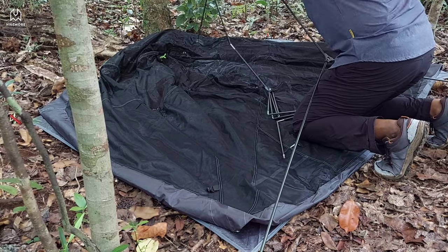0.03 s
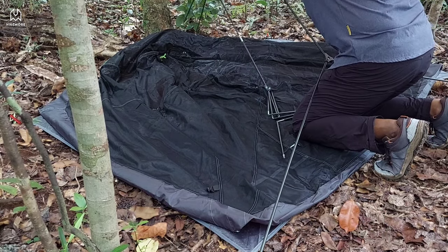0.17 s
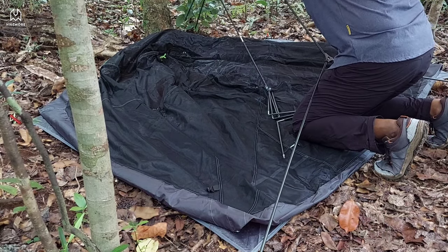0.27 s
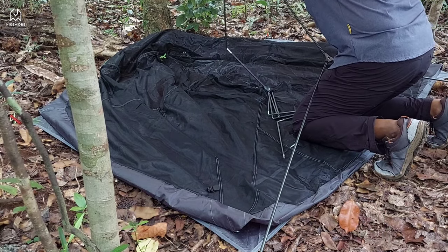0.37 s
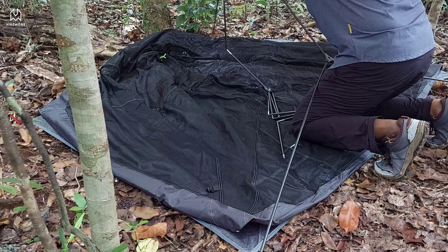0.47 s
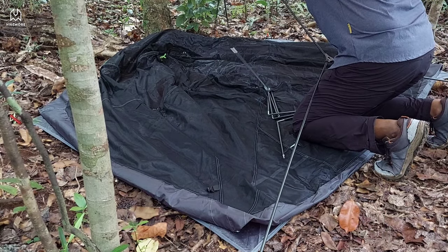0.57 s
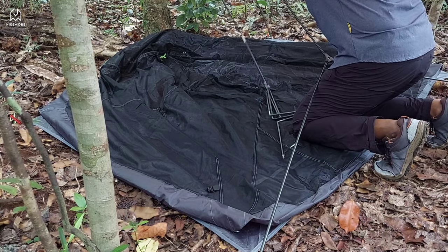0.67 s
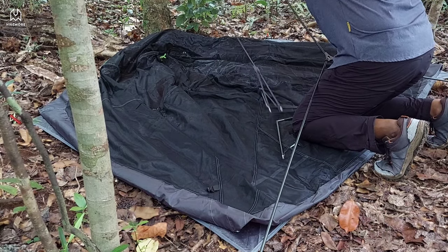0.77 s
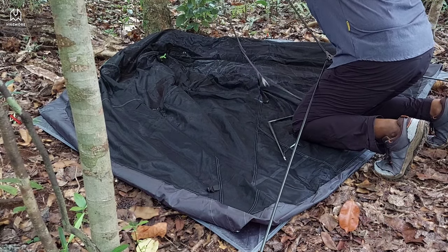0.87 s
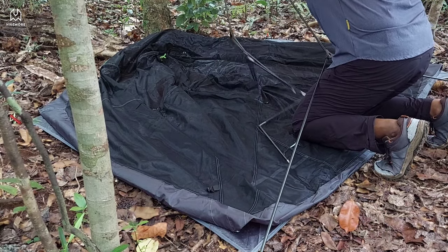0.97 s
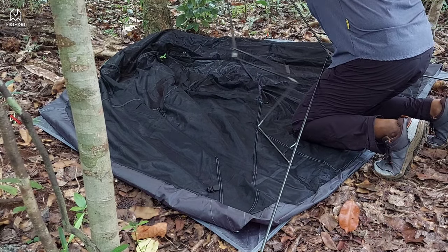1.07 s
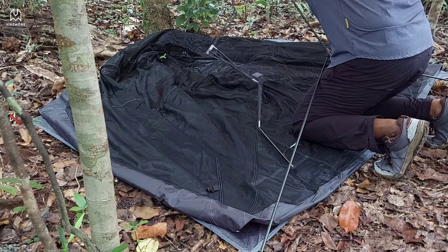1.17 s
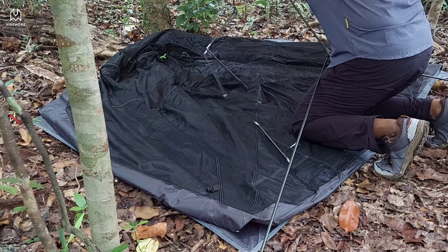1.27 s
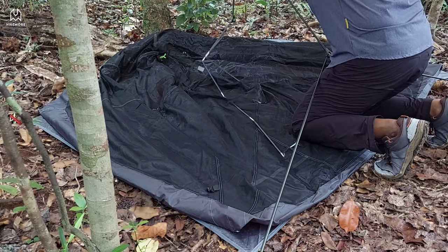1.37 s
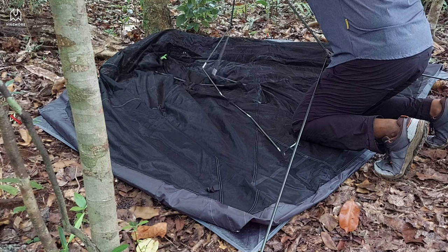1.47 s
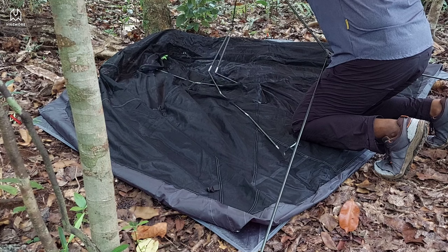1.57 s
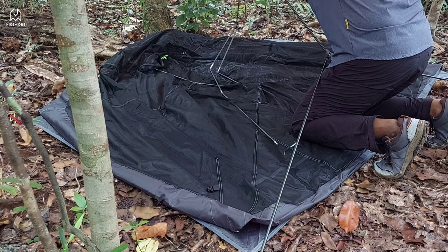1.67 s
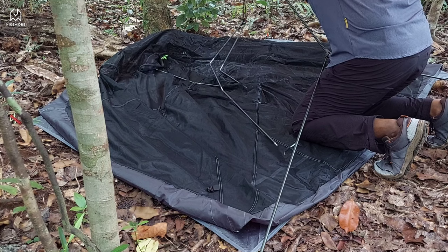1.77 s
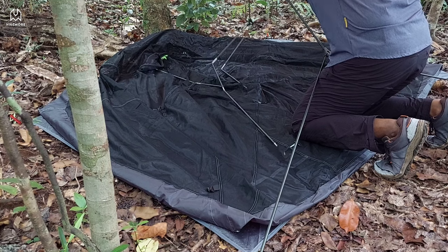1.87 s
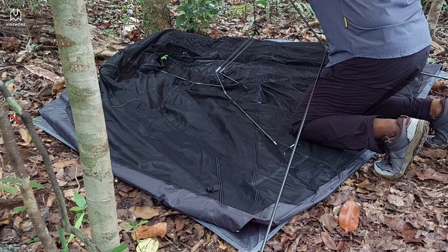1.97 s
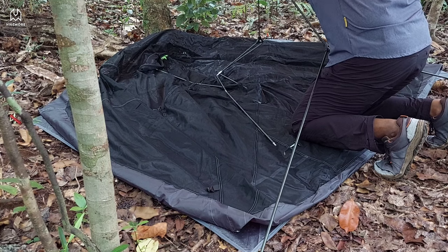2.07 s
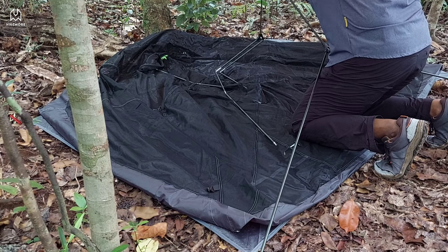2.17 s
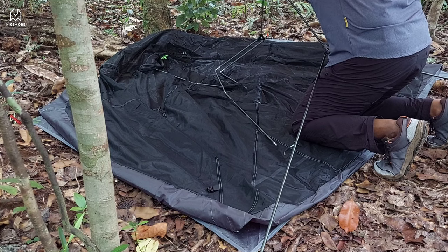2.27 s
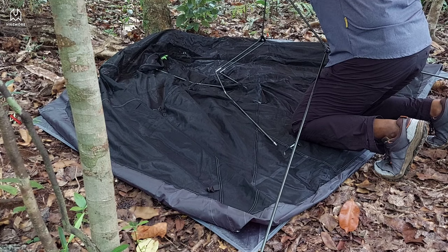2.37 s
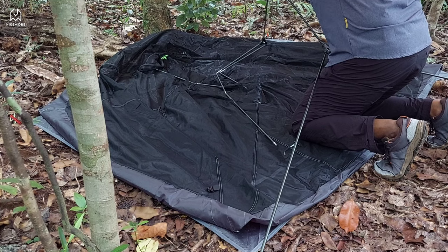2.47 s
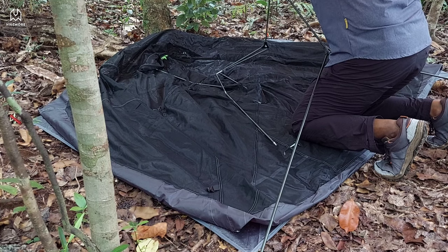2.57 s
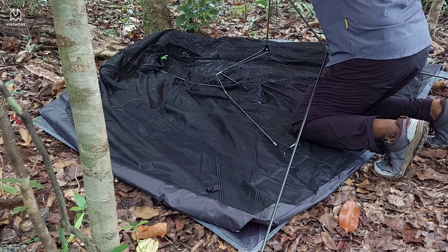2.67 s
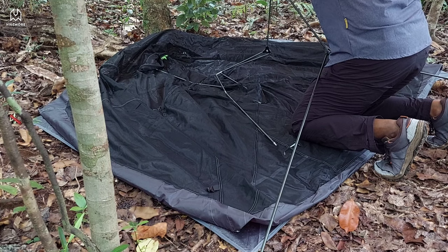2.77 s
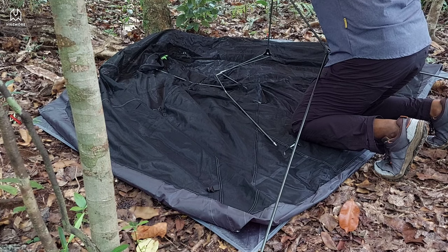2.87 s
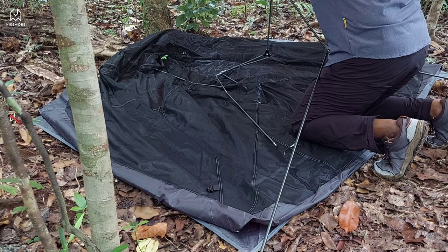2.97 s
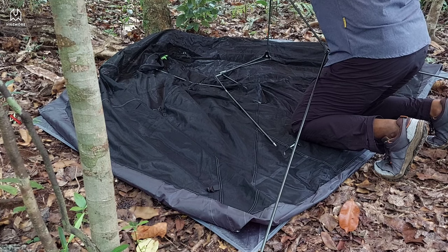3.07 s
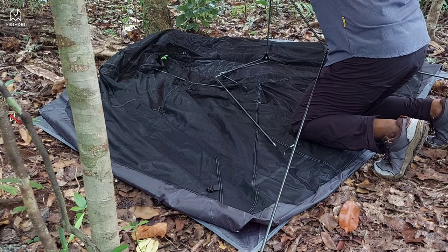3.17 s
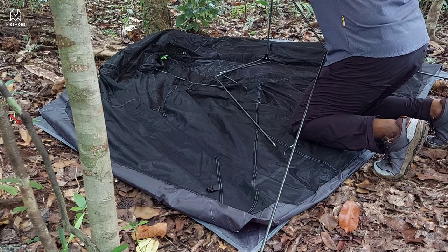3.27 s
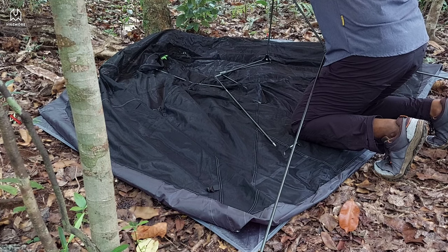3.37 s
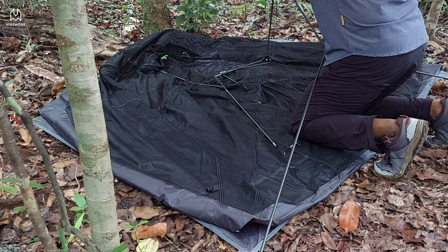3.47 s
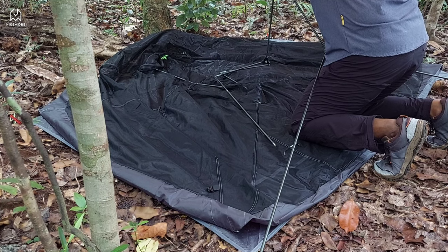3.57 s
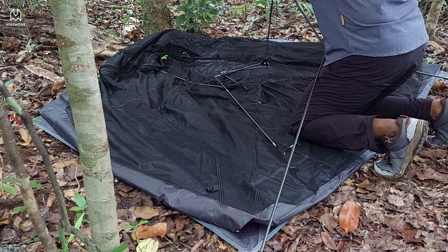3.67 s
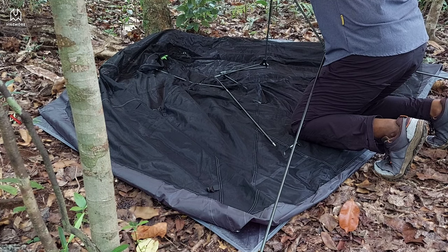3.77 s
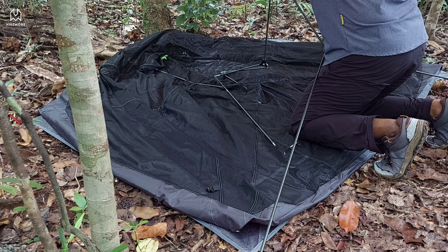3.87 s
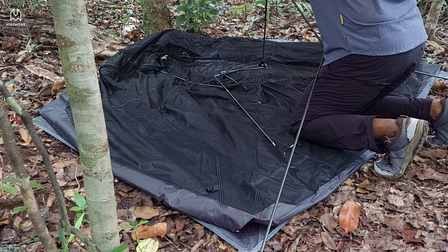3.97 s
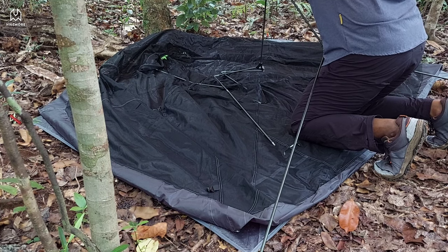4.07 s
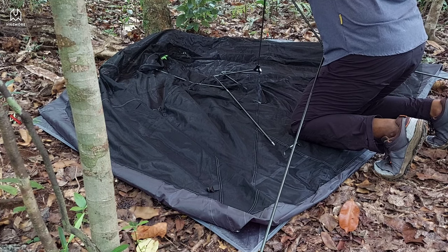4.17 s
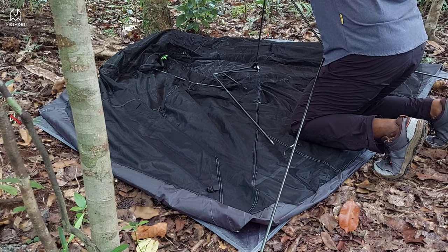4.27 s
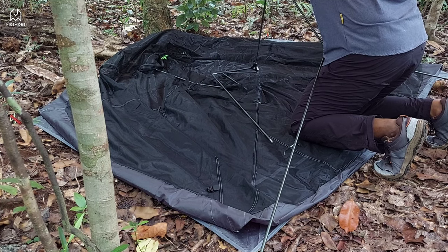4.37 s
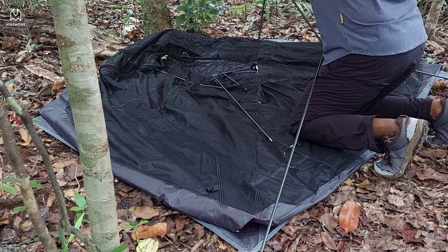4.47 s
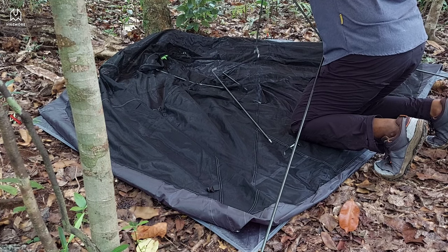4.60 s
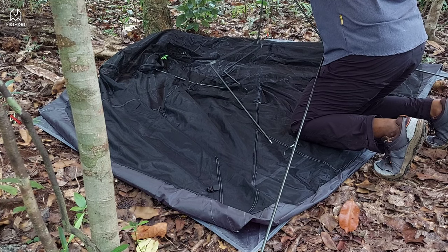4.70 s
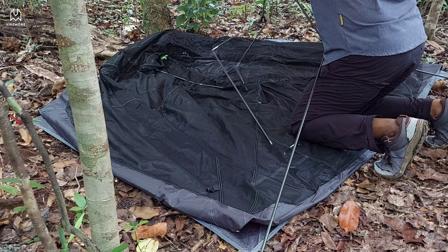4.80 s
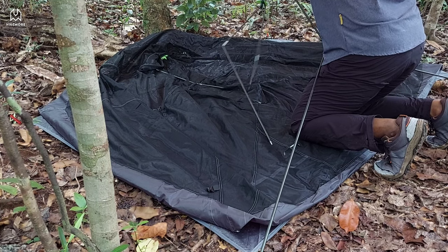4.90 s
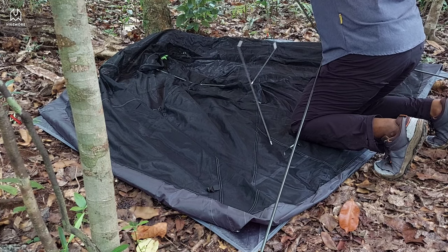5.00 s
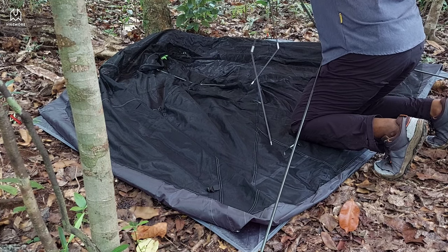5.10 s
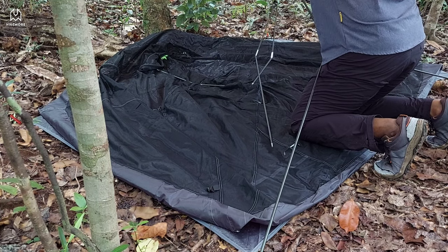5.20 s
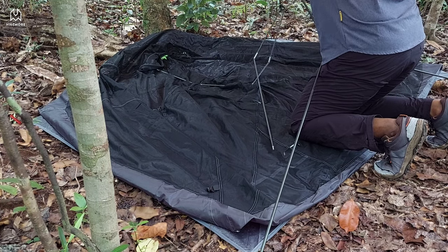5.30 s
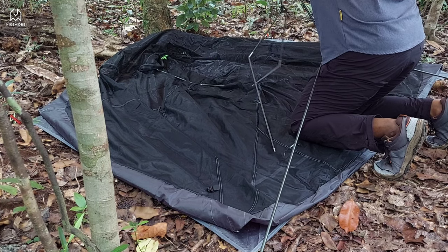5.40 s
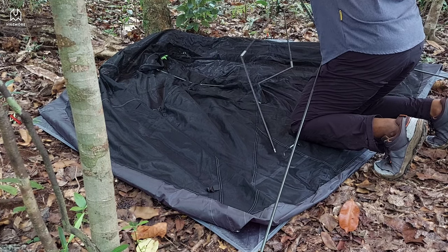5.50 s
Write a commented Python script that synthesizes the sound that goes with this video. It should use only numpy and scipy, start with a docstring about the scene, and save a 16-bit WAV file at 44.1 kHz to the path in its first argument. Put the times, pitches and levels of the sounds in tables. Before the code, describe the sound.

Bright, irregular clicks of metal tent pole sections knocking and slotting together outdoors, over a faint shrill insect chorus.

```python
"""Aluminium tent-pole sections clack together and snap into their sockets, a few metres away in a forest.
Someone kneels on the tent, unfolding the shock-corded set. Each contact cracks, rings the thin tubes and
echoes off the ground and trunks; two hard snaps also shake the whole pole. Between clicks the tubes
slide and brush over the fabric. Insects shrill above a faint low murmur of air."""
import sys
import numpy as np
from scipy.fft import rfft, irfft, next_fast_len
from scipy.io import wavfile
from scipy.ndimage import uniform_filter1d, map_coordinates

SR = 44100
rng = np.random.default_rng(int(sys.argv[2]) if len(sys.argv) > 2 else 0)


def log_audio(samples):
    """Write samples as a 16-bit WAV file to the path given in sys.argv[1]."""
    # one column per channel
    frames = np.atleast_2d(samples).T
    # limit to full scale, then quantise
    limited = np.clip(frames, -1, 1)
    pcm = np.round(limited * 32767).astype(np.int16)
    wavfile.write(sys.argv[1], SR, pcm)


N = 244300

# knocks and snaps: start_s, level_db, tail_db, bright_db, body_db, bend_hz, wall_hz, ground_db
POLE_KNOCKS = [(0.397, -23, -1.5, 0, -1, 5680, 11600, -10),
               (0.6704, -2.5, -1, -0.5, -5.5, 3370, 14000, -16),
               (0.854, -7.5, -7.5, 7.5, -2.5, 2660, 10960, -14),
               (0.8954, -8, 0.5, 4.5, -7.5, 4240, 7620, -11), (0.983, -9, 1.5, -6.5, -20, 3170, 10400, -20),
               (0.9933, -9.5, 1.5, 5, -9, 4800, 9900, -5), (1.069, -2, 2, -1.5, -8.5, 6280, 14800, -6),
               (1.3067, -3, -3, 0.5, -11.5, 2910, 12910, -13), (1.3555, -5.5, -3, 2, -0.5, 3250, 7400, -14),
               (1.6076, -23.5, -13, 8, 5, 5570, 10380, -16), (1.744, 1, 1.5, 5.5, -4.5, 3255, 11400, -5),
               (2.043, -17, -6, -2.5, -48, 5200, 7300, -20), (2.1329, -13, 0, 1, -6, 3380, 11770, -6),
               (2.3115, -20.5, -3, 2, -7, 3600, 13050, -7), (3.113, -13.5, -2, 7, -9, 4100, 11200, -4),
               (3.5995, -17.5, -1.5, -4.5, -6.5, 2900, 7260, -5), (4.028, -18, 1, 3.5, -5, 5800, 10600, -8),
               (4.3865, -4.5, 1.5, -1, -8, 3990, 12130, -2.5), (4.685, -19, -1, -4.5, -30, 4230, 7760, -12),
               (4.992, -10.5, 2, 0.5, -6, 4870, 12300, -4), (5.239, -14, 2, 4.5, -12, 4500, 14900, -4),
               (5.26, -5.5, -7, 3.5, -11, 4600, 7060, -8)]
# loose tubes touching in passing: start_s, level_db
POLE_GRAZES = [(0.656, -19.5), (0.771, -30), (0.795, -30), (0.8434, -24), (1.4104, -20), (1.427, -25),
               (2.083, -26.5), (2.117, -22.5), (2.2908, -27), (2.394, -32.5), (3.585, -23), (4.007, -29),
               (4.32, -34), (4.374, -26), (4.4641, -18.5), (4.742, -35.5), (5.1014, -26.5)]
# dull, lingering tone of all grazes: tail_db, bright_db, body_db, bend_hz, wall_hz, ground_db
GRAZE_TONE = (2.5, -4, -6, 5000, 12000, -6)
def poles():
    """Metal contacts crack, ring and echo; a square seating is brighter than a glancing knock."""
    out, t = np.zeros((2, N)), np.arange(SR // 2) / SR
    contacts = POLE_KNOCKS + [(start_s, level_db, *GRAZE_TONE) for start_s, level_db in POLE_GRAZES]
    for start_s, level_db, tail_db, bright_db, body_db, bend_hz, wall_hz, ground_db in contacts:
        tone = metal_tone(bright_db, body_db, bend_hz, wall_hz)
        hit = crack(t[:SR // 16], tone, stretch=amp(0.35 * tail_db))  # drier blows crack more briefly
        echoes = trunk_echoes(t, tone)
        ring = amp(-11 + 0.35 * bright_db) * tube_ring(t)
        ping = amp(-37 - 0.31 * bright_db) * bending_ping(t, bend_hz)
        add(out, start_s, amp(level_db - 1.5) * hit)
        add(out, start_s + GROUND_DELAY_S, amp(level_db + ground_db) * ground_echo(hit))
        add(out, start_s, amp(level_db + tail_db) * (echoes + ring + ping))
    return place(out, right_db=3.0)


# struck aluminium spectrum: freq_hz, gain_db
METAL_SPECTRUM = [(100, -30.5), (300, -21), (900, -22), (1400, -19), (2200, -8), (3200, -7.5), (4800, -2.5),
                  (7200, -3), (8100, -4.5), (9500, -3), (12000, -0.5), (14000, -6), (15300, -5.5),
                  (16500, -17)]
def metal_tone(bright_db, body_db, bend_hz, wall_hz):
    """dB curve of one blow: a favoured bending mode and wall mode among random lesser modes."""
    knots_hz = np.arange(0, SR / 2, 170)
    lesser_db = 2.6 * np.minimum(knots_hz / 2500, 1) * rng.standard_normal(len(knots_hz))

    def tone(hz):
        treble = bright_db * along([(5500, 0.026), (11500, 0.935), (13000, 1), (15000, 0.87)], hz)
        body = (body_db + 11) * along([(1400, 0.81), (2600, 0.012)], hz)
        bend = resonance(hz, bend_hz, width_hz=120, lift_db=6.0)
        wall = resonance(hz, wall_hz, width_hz=250, lift_db=6.5)
        return along(METAL_SPECTRUM, hz) + treble + body + bend + wall + np.interp(hz, knots_hz, lesser_db)
    return tone


# treble lift of the direct crack: freq_hz, gain_db
CRACK_LIFT = [(1500, 0), (7000, 0), (11000, 1.5)]
def crack(t, tone, stretch):
    """The contact itself: milliseconds of tiny bounces, partly alike in both channels."""
    attack_s, t60_s = 0.00048 * stretch, 0.016 * stretch
    noise = rng.standard_normal((2, len(t))) + 0.48 * rng.standard_normal(len(t))
    bounces = amp(3.5 * unit(uniform_filter1d(rng.standard_normal(len(t)), size=24)))
    envelope = (1 - np.exp(-(t / attack_s) ** 2)) * amp(-60 * t / t60_s)
    return unit_energy(colour(noise * bounces * envelope, lambda hz: tone(hz) + along(CRACK_LIFT, hz)))


# tube modes, bending below 6 kHz and wall above: pitch_hz, level_db, t60_s
TUBE_MODES = [(2650, -12, 0.13), (3270, -14, 0.12), (3480, -18, 0.14), (4700, -9, 0.15), (5170, -31, .2),
              (6300, -35, .18), (7500, 1, 0.22), (8850, -14.5, 0.12), (10340, 5, .2), (10540, 2, 0.14),
              (11305, 5, 0.14), (11200, -13, .22), (11650, -20, 0.2), (12100, -2, .2), (11900, 1, 0.16),
              (12900, -4, .24), (12770, -4, 0.13), (12863, 7, 0.17), (13148, -3, .2), (13325, -6, 0.15),
              (15400, -8, .2)]
def tube_ring(t, spread_db=3.5):
    """The tubes ring in bending and wall modes; each blow lands on another spot and shares its energy
    differently."""
    pitch_hz, level_db, t60_s = np.transpose(TUBE_MODES)[:, :, None]
    modes = amp(level_db - 60 * t / t60_s) * np.sin(2 * np.pi * pitch_hz * t)
    shares = amp(spread_db * rng.standard_normal((2, len(TUBE_MODES))))
    signs = rng.choice([-1, 1], len(TUBE_MODES))
    return unit_energy((shares * signs) @ modes)


def bending_ping(t, pitch_hz, t60_s=0.062):
    """The struck section's bending mode rings briefly."""
    return amp(-60 * t / t60_s) * np.sin(2 * np.pi * pitch_hz * t)


GROUND_DELAY_S = 0.0068
# ground reflection: freq_hz, gain_db
GROUND_TILT = [(1500, -6.5), (7000, -8), (11000, 3)]
def ground_echo(hit, right_db=1.5):
    """The ground returns a filtered copy of the crack, channels swapped."""
    return pan(unit_energy(colour(hit[::-1], lambda hz: along(GROUND_TILT, hz))), right_db)


def trunk_echoes(t, tone, rise_s=0.0025, near_t60_s=0.2, far_t60_s=0.4, far_db=-9.5):
    """Near trunks scatter a lumpy train of echoes; the deeper wood answers weakly and longer."""
    lumps = amp(unit(uniform_filter1d(rng.standard_normal((2, len(t))), size=70, axis=1)))
    fade = np.hypot(amp(-60 * t / near_t60_s), amp(far_db - 60 * t / far_t60_s))
    onset = 1 - np.exp(-(t / rise_s) ** 2)
    echoes = rng.standard_normal((2, len(t))) * lumps * fade * onset
    tilt = [(300, 3.5), (1500, -1.5), (4000, 0.5), (15400, 1.5), (16000, -9)]  # freq_hz, gain_db
    return unit_energy(colour(echoes, lambda hz: tone(hz) + along(tilt, hz)))


# stereo width of the clicks: freq_hz, side_db
CLICK_WIDTH = [(300, -7.5), (2000, -4), (4500, 0), (9000, 0.5)]
def place(x, right_db):
    """The poles lie a little to the right; long waves reach both sides more alike."""
    mid = (x[0] + x[1]) / 2
    side = colour((x[0] - x[1]) / 2, lambda hz: along(CLICK_WIDTH, hz))
    return pan(np.array([mid + side, mid - side]), right_db)


# whole-pole notes on hard snaps: start_s, level_db, pitch_hz, t60_s
POLE_THUMPS = [(0.67, -46, 356, 0.14), (1.744, -48.5, 250, 0.19)]
def thumps(attack_s=0.0068):
    """The cord pulls a joint home and the whole pole gives a short, rough, low note."""
    out, t = np.zeros((2, N)), np.arange(SR // 2) / SR
    for start_s, level_db, pitch_hz, t60_s in POLE_THUMPS:
        phase = 2 * np.pi * pitch_hz * t + wobble(54)[:len(t)]
        envelope = amp(level_db - 60 * t / t60_s) * (1 - np.exp(-t / attack_s))
        add(out, start_s, pan(envelope * np.sin(phase), right_db=-2))
    return out


# sections drawn along the cord: peak_s, level_db, length_s
SLIDE_STROKES = [(0.01, -59.5, 0.38), (0.21, -64.5, 1), (0.79, -55.5, 0.68), (0.893, -48.5, 0.2),
                 (1.139, -49.5, 0.1), (1.39, -57, 0.4), (1.553, -56, 0.33), (1.74, -53.5, 0.065),
                 (2.43, -66, 0.13), (2.596, -64.5, 0.4), (3.152, -54.5, 0.11), (3.284, -66, 0.13),
                 (3.552, -57.5, 0.21), (4.428, -56, 0.28)]
# sliding metal spectrum: freq_hz, gain_db
SLIDE_SPECTRUM = [(200, -31.5), (1200, -5), (2200, -5), (4500, 1), (7000, -0.5), (8500, -5.5),
                  (12000, -1.5), (15300, -10.5)]
def sliding(t, rise_share=0.49, depth_db=20, settle_db=-63.5, settle_db_per_s=42):
    """Stick-slip grains of metal: each stroke swells and fades, and the tubes settle after each knock."""
    gains = []
    for peak_s, level_db, length_s in SLIDE_STROKES:
        from_peak = np.maximum((peak_s - t) / rise_share, (t - peak_s) / (1 - rise_share)) / length_s
        gains.append(amp(level_db - depth_db * from_peak))
    for start_s, *_ in POLE_KNOCKS:
        gains.append((t > start_s) * amp(settle_db - settle_db_per_s * np.abs(t - start_s)))
    stick_slip = amp(1.4 * wobble(500) + 2.36 * wobble(60))
    return np.linalg.norm(gains, axis=0) * stereo_noise(SLIDE_SPECTRUM, grain=stick_slip)


# drags over the tent: start_s, hold_s, level_db
FABRIC_DRAGS = [(0, 0.24, -77), (1.324, 0.15, -66.5), (1.499, 0.07, -56)]
# brushed fabric spectrum: freq_hz, gain_db
FABRIC_SPECTRUM = [(71, -23), (120, -3.5), (384, -6.5), (715, -3.5), (1250, -6), (1520, -5), (1880, -4.5),
                   (6000, -26), (7800, -42), (13200, -120)]
def dragging(t, attack_s=0.0023, release_db_per_s=420):
    """A pole end or knee catches on the fabric, brushes over it and lets go."""
    gain = np.zeros(N)
    for start_s, hold_s, level_db in FABRIC_DRAGS:
        catch = np.clip((t - start_s) / attack_s, 0, 1)
        gain += catch * amp(level_db - release_db_per_s * np.maximum(t - start_s - hold_s, 0))
    return gain * stereo_noise(FABRIC_SPECTRUM, grain=amp(2.2 * wobble(250)))


# weight shifts: peak_s, level_db
BODY_SWAYS = [(1.37, -63.5), (1.74, -66), (4.07, -69), (4.35, -66.5), (5.29, -67)]
# low stir of body or breeze: freq_hz, gain_db
STIR_SPECTRUM = [(20, -39.5), (35, -29), (55, 0.5), (80, 0), (130, -2), (190, -13), (400, -10), (1000, -53)]
def swaying(t, half_length_s=0.086):
    """The kneeling body shifts its weight with a low stir."""
    gain = sum(amp(level_db) * np.exp(-((t - peak_s) / half_length_s) ** 2)
               for peak_s, level_db in BODY_SWAYS)
    return gain * stereo_noise(STIR_SPECTRUM)


# insect chorus spectrum: freq_hz, gain_db
INSECT_SPECTRUM = [(4300, -29), (5100, -14), (5380, -0.5), (5600, -0.5), (5950, -22.5), (6800, -24)]
def insects(t, start_db=-69, swell_db_per_s=0.69):
    """A shrill, fluttering chorus slowly grows louder."""
    flutter = amp(2.2 * wobble(70))
    return amp(start_db + swell_db_per_s * t) * stereo_noise(INSECT_SPECTRUM, grain=flutter)


# still forest air spectrum: freq_hz, gain_db
AIR_SPECTRUM = [(15, -35), (25, -20), (43, -4), (93, -4), (176, -8), (318, -4.5), (354, -12), (501, -9),
                (1210, -17.5), (1910, -15), (4870, -16), (5420, -10), (6720, -18.5), (15000, -20.5)]
def forest_air(air_db=-67.0, breeze_db=-73.5):
    """Barely wavering air over a steady low breeze."""
    air = amp(air_db + 0.13 * wobble(2.1)) * stereo_noise(AIR_SPECTRUM)
    return air + amp(breeze_db) * stereo_noise(STIR_SPECTRUM)


# noise balance: freq_hz, left_minus_right_db
NOISE_BALANCE = [(60, 10.5), (120, 8), (250, 5), (700, 2), (1300, 0), (4400, -3.5), (15000, -3.5)]
# left-right likeness: freq_hz, correlation
NOISE_CORRELATION = [(50, 0.145), (250, 0.59), (1000, 0.19), (3000, 0.057), (12000, .05)]
def stereo_noise(spectrum, grain=1):
    """Noise of rms 1: bass partly alike and leaning left, treble nearly unrelated and leaning right."""
    size = next_fast_len(N, real=True)
    hz = np.fft.rfftfreq(size, 1 / SR)
    angle = np.arccos(along(NOISE_CORRELATION, hz)) / 2
    mid, side = rfft(rng.standard_normal((2, N)) * grain, size) * [np.cos(angle), np.sin(angle)]
    lean_db = along(NOISE_BALANCE, hz) / 2
    gain = amp(along(spectrum, hz) + [lean_db, -lean_db])
    return unit(irfft(np.array([mid + side, mid - side]) * gain, size)[:, :N])


def resonance(hz, centre_hz, width_hz, lift_db):
    """dB gain of one damped mode above the rest of the spectrum."""
    return 10 * np.log10(1 + amp(lift_db) ** 2 / (1 + (2 * (hz - centre_hz) / width_hz) ** 2))


def colour(x, gain_db):
    """Minimum-phase filter with response gain_db(hz)."""
    size = next_fast_len(x.shape[-1] + SR // 20, real=True)
    cepstrum = irfft(np.log(amp(gain_db(np.fft.rfftfreq(size, 1 / SR)))), size)
    cepstrum[1:size // 2] *= 2
    cepstrum[size // 2:] = 0
    return irfft(rfft(x, size) * np.exp(rfft(cepstrum)), size)[..., :x.shape[-1]]


def along(points, hz):
    """Read (freq_hz, value) points on a log axis."""
    knots_hz, values = np.transpose(points)
    return np.interp(np.log(hz + 1), np.log(knots_hz), values)


def wobble(rate_hz):
    """Smooth random curve, rate_hz knots a second."""
    knots = rng.standard_normal(int(N * rate_hz / SR) + 4)
    return map_coordinates(knots, [np.arange(N) * rate_hz / SR])


def add(track, start_s, sound):
    """Mix a stereo sound in at start_s."""
    start = round(start_s * SR)
    track[:, start:start + sound.shape[1]] += sound[:, :N - start]


def pan(x, right_db):
    """Tilt the balance right by right_db."""
    return x * amp([[-right_db / 2], [right_db / 2]])


def amp(db):
    """Decibels to gain."""
    return 10 ** (np.asarray(db) / 20)


def unit(x):
    """Scale to rms 1."""
    return x / np.sqrt(np.mean(x ** 2) + 1e-20)


def unit_energy(x):
    """Scale to mean energy 1 per channel."""
    return unit(x) / np.sqrt(x.shape[-1])


def scene():
    """Pole work over the forest background."""
    t = np.arange(N) / SR
    work = poles() + thumps() + sliding(t) + amp(1.0) * dragging(t) + swaying(t)
    return work + forest_air() + insects(t)


# band limit: freq_hz, gain_db
TREBLE_CUT = [(15500, 0), (15700, -12), (16400, -16), (16800, -90)]
def record(dry):
    """The treble falls off steeply above 15.5 kHz."""
    size = next_fast_len(N + SR // 2)
    gain = amp(along(TREBLE_CUT, np.fft.rfftfreq(size, 1 / SR)))
    return irfft(rfft(dry, size) * gain, size)[:, :N]


dry = scene()
out = record(dry)
log_audio(out)
```